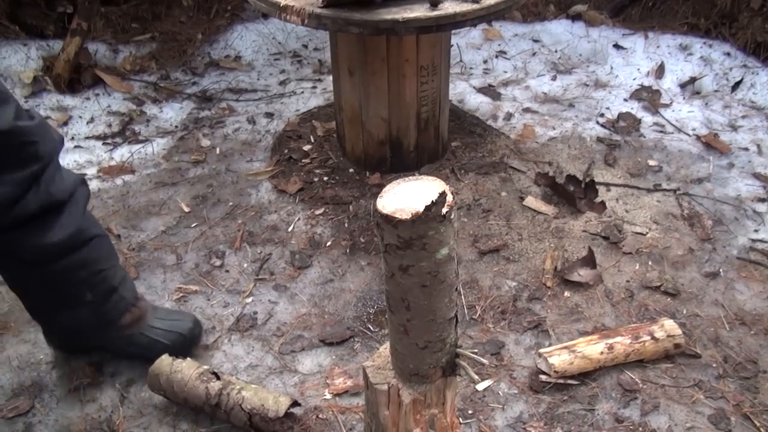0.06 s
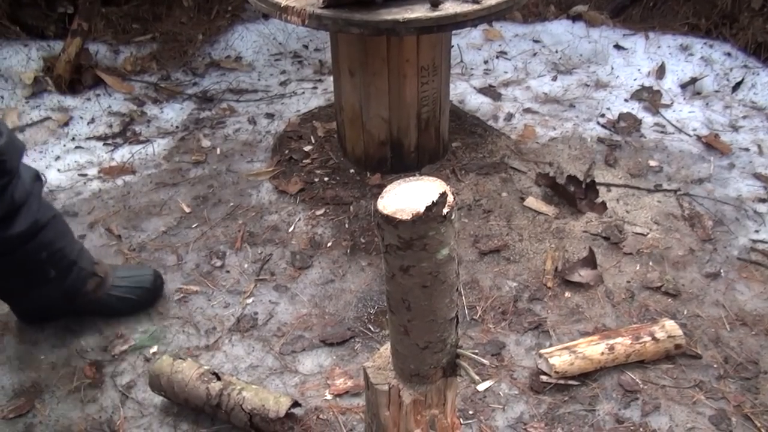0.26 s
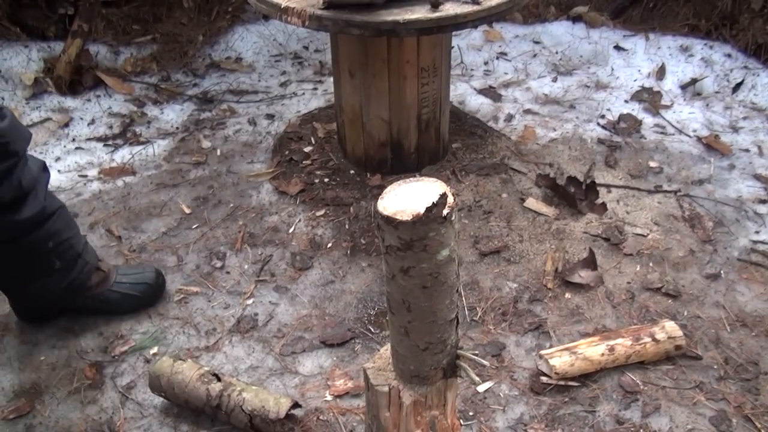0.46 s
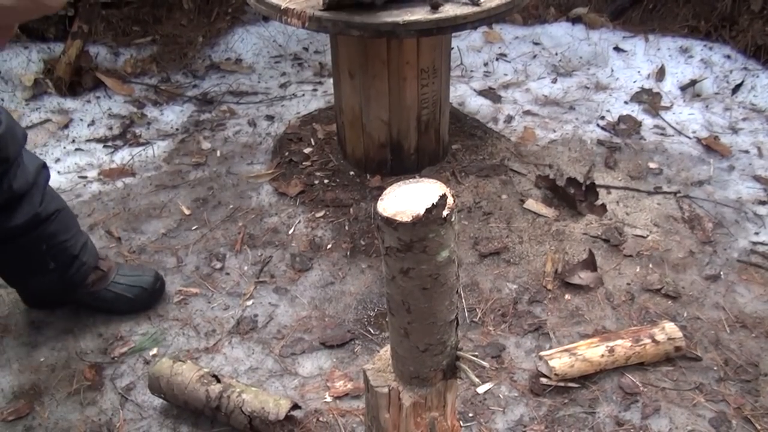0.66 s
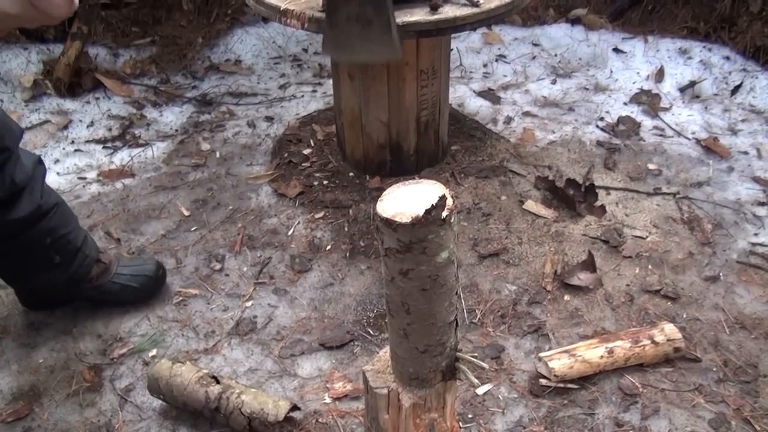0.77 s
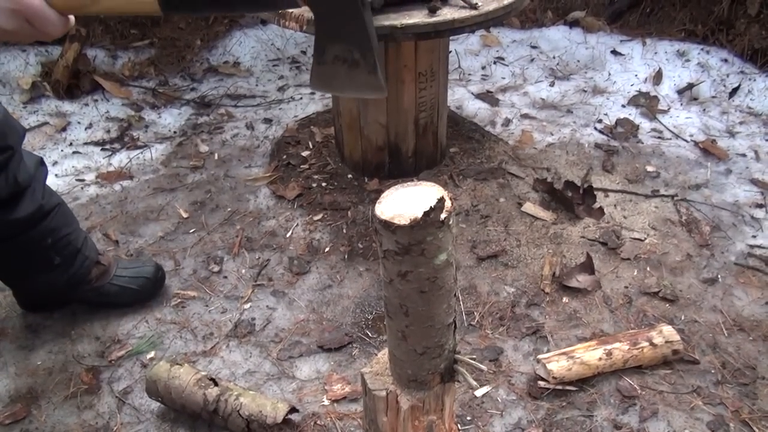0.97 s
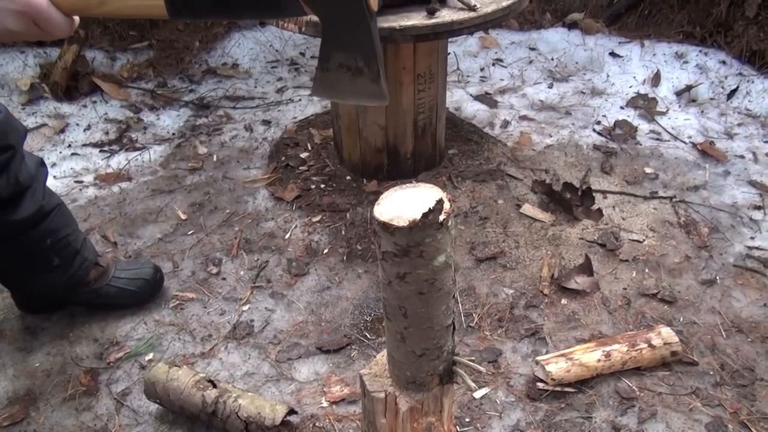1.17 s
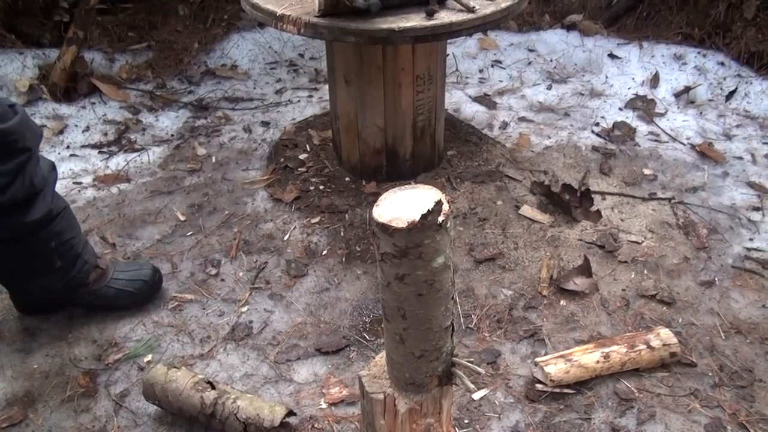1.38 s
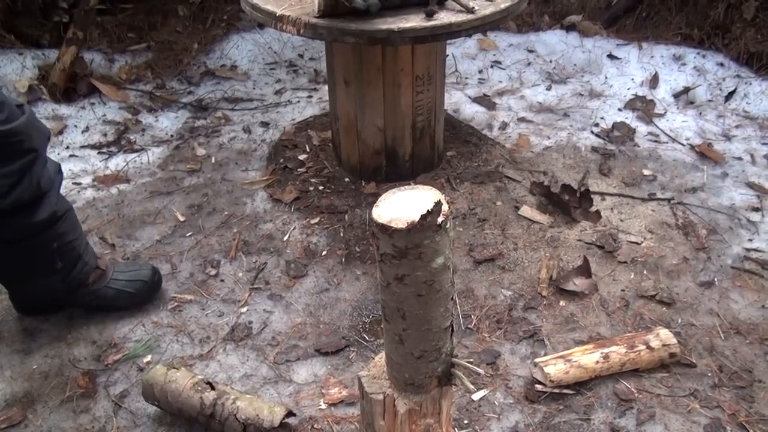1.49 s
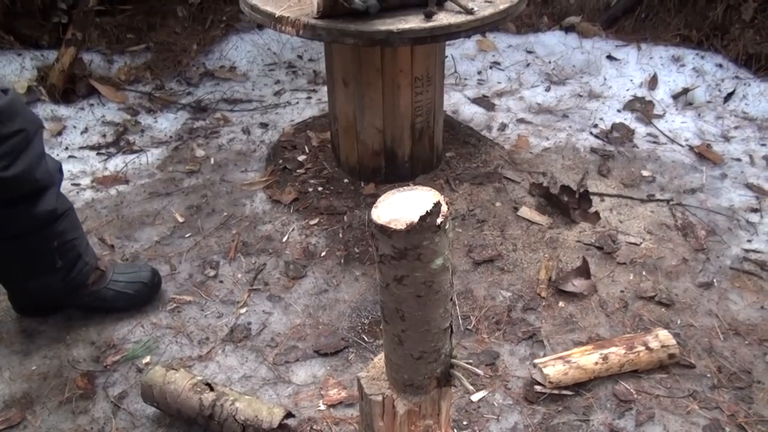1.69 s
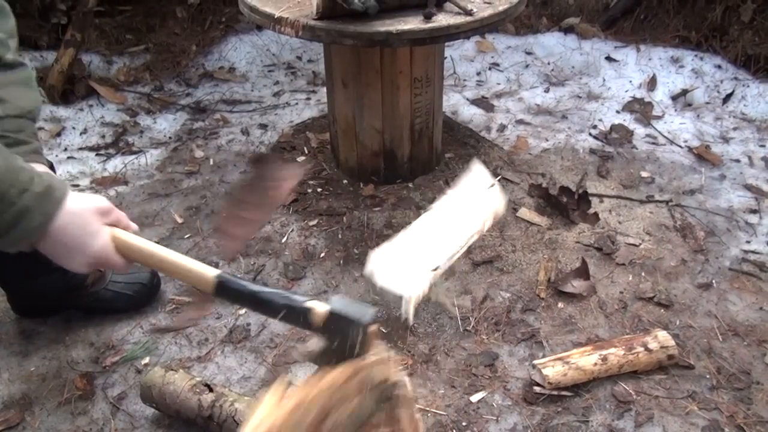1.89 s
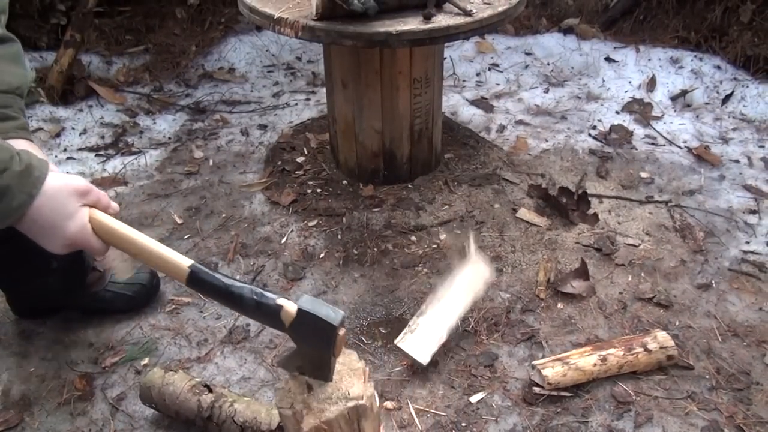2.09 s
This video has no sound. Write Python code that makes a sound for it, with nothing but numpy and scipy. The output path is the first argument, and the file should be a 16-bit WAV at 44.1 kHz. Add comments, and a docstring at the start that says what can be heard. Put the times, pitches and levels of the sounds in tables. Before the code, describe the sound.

Gritty boot scuffs and a dull thump come first, then near quiet with faint taps and cloth rustle, then a hard wooden crack and small clattering pieces. Outdoors, close, nearly central, faint air noise.

```python
"""An axe splits a small log on a chopping block in a quiet frozen yard: snapping fibres crackle and
set the log ringing, dull blows thud, and split pieces knock with struck modes.
Before that, boots scuff gritty ground as dense clumped clicks and a jacket rustles through the swing
as fine clicks. Ticks of grit and chips are clicks with short noise bursts; the ground shudders in
low noise. Filtered noise and a thin sine make the yard behind it, and low noise buffets the left."""
import sys
import numpy as np
from scipy import signal
from scipy.io import wavfile
from scipy.ndimage import uniform_filter1d

SR = 44100
rng = np.random.default_rng(int(sys.argv[2]) if len(sys.argv) > 2 else 0)


def file_out(sig):
    """Save sig as 16-bit WAV at sys.argv[1]."""
    # one column per channel
    cols = np.atleast_2d(sig).T
    # limit, then scale
    lim = np.clip(cols, -1, 1)
    pcm = np.round(lim * 32767).astype(np.int16)
    wavfile.write(sys.argv[1], SR, pcm)


def gain_from_decibels(decibels):
    """Convert decibel values to linear amplitude factors."""
    exponent = np.asarray(decibels, float) / 20
    return 10 ** exponent


N = 94770  # length in samples

CLICK_S = 2e-5  # decay time of the contact click in ticks and knocks


def rms_one(x):
    """Scale to unit rms."""
    return x / np.sqrt(np.mean(x ** 2) + 1e-20)


def band(x, low_hz, high_hz):
    """Band-pass of order 2."""
    edges_hz = [low_hz, min(high_hz, 0.45 * SR)]
    return signal.sosfilt(signal.butter(2, edges_hz, "band", fs=SR, output="sos"), x)


def ring(x, hz, t60):
    """Two-pole resonator: a unit click sets a dying sine of starting height 1 ringing."""
    radius = gain_from_decibels(-60 / (t60 * SR))
    angle = 2 * np.pi * hz / SR
    return signal.lfilter([0, np.sin(angle)], [1, -2 * radius * np.cos(angle), radius ** 2], x + 1e-18)


def add(out, s, x):
    """Mix x in at time s, in seconds."""
    i = int(s * SR)
    out[i:i + len(x)] += x[:N - i]


def grains(per_s, size_db):
    """Random clicks of uneven size and either sign."""
    happens = rng.random(N) < per_s / SR
    size = gain_from_decibels(size_db * np.minimum(rng.exponential(1, N), 5))
    return happens * size * rng.choice([-1, 1], N)


def drift(rate_hz):
    """Smoothly wandering random curve of unit rms."""
    r = np.exp(-2 * np.pi * rate_hz / SR)
    return rms_one(signal.lfilter([1], [1, -2 * r, r * r], rng.standard_normal(N)))


def coloured(sources, spectrum):
    """Shape two sources with a half-octave bank; returns middle, treble, bass and low-middle parts."""
    hz, db = np.transpose(spectrum)
    parts = np.zeros((4, N))
    edges = 22.1 * 2 ** np.arange(0, 9.6, 0.5)
    for k, (low, high) in enumerate(zip(edges, edges[1:])):
        centre = np.sqrt(low * high)
        gain = gain_from_decibels(np.interp(np.log(centre), np.log(hz), db))
        # counted from the end: bass is -2, low middle -1, then middle 0 and treble 1
        part = int(centre > 250) + int(centre > 900) + int(centre > 3800) - 2
        parts[part] += gain * band(sources[k % 2], low, high)  # neighbouring bands use different sources
    return parts


def stroke(rows, parts, fade_s):
    """Each part, at unit rms, follows its level curve; silent outside the stroke."""
    s, *levels = np.transpose(rows)
    t = np.arange(N) / SR
    fade_in = np.clip((t - s[0]) / 0.00026 + 1, 0, 1)
    fade_out = np.clip((s[-1] - t) / fade_s + 1, 0, 1)
    shaped = sum(rms_one(part) * gain_from_decibels(np.interp(t, s, db)) for part, db in zip(parts, levels))
    return fade_in * fade_out * shaped


def yard():
    """Distant wash of shaped noise, a faint hum of narrow-band noise and a thin sine whine."""
    # Colour of the wash. Each row: frequency in Hz, relative level in dB.
    wash_spectrum = [(15, -53), (25, -25), (87, -5.5), (166, -15), (659, -13), (911, -13), (1040, -19),
                     (1130, -15), (1520, -16), (14800, -31), (16000, -22)]
    wash_db, hum_db, whine_db = -65.5, -75.5, -88
    hum_hz, hum_half_width_hz, whine_hz = 1170, 22, 13700
    wash = rms_one(coloured(rng.standard_normal((2, N)), wash_spectrum).sum(axis=0))
    hum = rms_one(band(rng.standard_normal(N), hum_hz - hum_half_width_hz, hum_hz + hum_half_width_hz))
    whine = np.sin(2 * np.pi * whine_hz * np.arange(N) / SR)
    return gain_from_decibels(wash_db) * wash + gain_from_decibels(hum_db) * hum + gain_from_decibels(whine_db) * whine


def air_buffet(near):
    """Low noise of air on the left port, stirred by nearby movement."""
    level_db, follow_power = -63, 0.57
    stir = (uniform_filter1d(np.abs(near), size=2000) + 1e-6) ** follow_power
    air = rms_one(band(rng.standard_normal(N), 18, 59))
    return gain_from_decibels(level_db) * rms_one(stir) * air


def scuffs():
    """Dense grit dragged under the sole, crushed in clumps; the bass of grit stays weak."""
    # Boots dragging on grit. Each row: time in seconds, then the levels of middle, treble, bass
    # and low middle in dB, the bass before its ceiling.
    scuff_curve = [(0.0, -56, -62, -65, -51), (0.016, -53, -59.5, -66, -59.5),
                   (0.046, -53.5, -55.5, -60.5, -53.5), (0.054, -51.5, -54.5, -60.5, -70),
                   (0.08, -47, -55.5, -68, -43), (0.092, -59, -57, -72, -61), (0.194, -62, -67, -93, -67.5),
                   (0.222, -55, -60, -38, -65), (0.248, -50, -53, -50, -46),
                   (0.288, -50.5, -48.5, -48.5, -46), (0.314, -50.5, -55.5, -73, -53.5),
                   (0.342, -60, -65.5, -65, -66.5), (0.386, -55, -58.5, -73, -58),
                   (0.432, -48.5, -54, -56, -51), (0.452, -61, -64.5, -60, -65.5),
                   (0.478, -67, -67, -76, -65), (0.51, -45, -50, -34, -44), (0.56, -41, -43.5, -48, -44),
                   (0.586, -43.5, -52.5, -53.5, -51.5), (0.608, -69, -66, -77, -64),
                   (0.64, -56.5, -67, -73, -65), (0.67, -66, -65.5, -86, -75.5),
                   (0.706, -46, -49.5, -62, -49.5), (0.762, -62.5, -65.5, -72, -64),
                   (0.814, -60.5, -62.5, -84, -65), (0.844, -58.5, -64.5, -84, -63),
                   (0.854, -69, -67, -73, -67), (0.9, -66.5, -74, -83, -71)]
    # Colour of the grit. Each row: frequency in Hz, relative level in dB.
    grit_spectrum = [(29, -34), (50, -7), (198, -1), (950, -2), (1150, -4), (2320, -9), (4040, -13),
                     (7210, -15), (16000, -27.5)]
    grains_per_s, grain_size_db = 5000, 2
    clump_rate_hz, clump_db = 70.5, 3
    bass_max_db = -43.5
    rows = [(s, mid, treble, min(bass, bass_max_db), low) for s, mid, treble, bass, low in scuff_curve]
    crushed = [grains(grains_per_s, grain_size_db) * gain_from_decibels(clump_db * drift(clump_rate_hz)) for _ in range(2)]
    return stroke(rows, coloured(crushed, grit_spectrum), fade_s=0.081)


def thuds():
    """A soft push: a low sine with a quickly swelling onset that dies away."""
    # Dull blows of heel, blade and wood on ground or block. Each row: start in seconds,
    # relative level in dB, frequency in Hz, 60 dB decay time in seconds.
    blows = [(.043, -45, 170, 0.042), (0.227, -44.5, 129, 0.069), (.427, -41.5, 288, 0.035),
             (0.511, -18.5, 169, 0.028), (1.005, -59, 273, 0.039), (1.3294, -50, 680, 0.015),
             (1.331, -54, 327, 0.021), (1.8116, -17, 481, 0.016), (1.8473, -13.5, 390, 0.01),
             (1.858, -30.5, 117.4, 0.1), (2.1376, -12, 336, 0.009), (2.1405, -22, 116, 0.072),
             (2.142, -29.5, 480, 0.0066)]
    out = np.zeros(N)
    t = np.arange(int(0.3 * SR)) / SR
    for s, db, hz, t60 in blows:
        swell = 1 - np.exp(-3.0 * hz * t)
        decay = gain_from_decibels(db - 60 * t / t60)
        add(out, s, 2 * decay * swell * np.sin(2 * np.pi * hz * t))
    return out


def ticks():
    """A sharp click and a burst of dying noise in one band."""
    # Small ticks of grit, zips and chips. Each row: start in seconds, peak level in dB,
    # centre frequency in Hz, 60 dB decay time of the noise in seconds, bandwidth in octaves.
    tick_rows = [(.044, -29.5, 3360, 0.013, 2.2), (.130, -38, 1600, 0.018, 1.4),
                 (0.4257, -31, 2420, 0.011, 1.08), (.489, -49, 1200, 0.027, 2.2),
                 (.664, -52, 2050, 0.017, 1.2), (0.6851, -36.5, 6000, .015, 1),
                 (0.819, -38, 2600, 0.022, 1.1), (.841, -39.5, 2600, 0.013, 1.6),
                 (.953, -45, 2750, 0.013, 1.6), (1.003, -43.5, 1930, 0.047, 2.2),
                 (1.077, -47.5, 3930, 0.034, 2.2), (1.330, -37, 1500, 0.032, 2),
                 (1.622, -39.5, 980, .012, 1.2), (1.7, -39, 2690, 0.025, 0.66),
                 (1.932, -29, 5960, .012, 3.1), (1.947, -21, 7400, 0.013, 0.9),
                 (1.9595, -31, 5000, 0.0068, 3.9), (1.9601, -19, 9200, 0.0089, 2.5),
                 (1.975, -34, 8870, 0.022, 0.4), (1.998, -42, 2960, 0.024, 0.87),
                 (2.055, -28, 4300, .015, 0.94), (2.077, -26, 7800, 0.022, 2.2),
                 (2.085, -25.5, 6130, 0.019, 0.89), (2.128, -26.5, 5960, 0.028, 0.79),
                 (2.1355, -22, 8200, .02, 1.3)]
    out = np.zeros(N)
    t = np.arange(2048) / SR
    for s, db, hz, t60, width in tick_rows:
        burst = rng.standard_normal(len(t)) * gain_from_decibels(-60 * t / t60) + 6.3 * np.exp(-t / CLICK_S)
        half_width = 2 ** (width / 2)
        x = band(band(burst, hz / half_width, hz * half_width), 110, 12000)
        add(out, s, gain_from_decibels(db) * x / np.abs(x).max())
    return out


def knocks():
    """A blow and a short rattle ring the modes of a piece; higher modes die sooner."""
    # Knocks of twigs, handle and split pieces, and the main crack of the log as it splits (1.8219 s and 1.8325
    # s). Each row: start in seconds, peak level in dB, # reference mode in Hz, 60 dB decay time of that mode in
    # seconds.
    knock_rows = [(0.4265, -33, 1650, 0.016), (0.842, -41.5, 2290, .025), (1.003, -48.5, 2130, 0.032),
                  (1.329, -47, 2017, 0.073), (1.8219, -18, 1544, 0.045), (1.8325, -12.5, 1170, 0.057),
                  (1.8745, -26.5, 2014, 0.038), (1.879, -26, 2040, .02), (2, -37, 1970, 0.04),
                  (2.0548, -29.5, 2070, 0.046), (2.067, -33, 1576, 0.043), (2.076, -28.5, 2470, .025),
                  (2.086, -28, 2470, .02), (2.096, -40, 2360, 0.017), (2.127, -30.5, 1464, 0.032),
                  (2.134, -28, 1550, 0.014)]
    # Modes of a piece. Each row: ratio to the reference mode, relative level in dB.
    piece_modes = [(1, 0), (.93, -7), (.62, -12), (1.45, -11), (2.02, -13), (2.75, -13)]
    out = np.zeros(N)
    t = np.arange(4096) / SR
    for s, db, hz, t60 in knock_rows:
        rattle = 0.13 * rng.standard_normal(len(t)) * np.exp(-t / 0.0021)
        contact = np.exp(-t / CLICK_S) + rattle
        x = sum(gain_from_decibels(g) * ring(contact, hz * k, t60 / np.sqrt(k)) for k, g in piece_modes)
        add(out, s, gain_from_decibels(db) * x / np.abs(x).max())
    return out


def jacket():
    """Stiff cloth rustles in many fine crinkles, each a small click."""
    # Jacket during the swing. Each row: time in seconds, then the levels of middle, treble,
    # bass and low middle in dB.
    swing_curve = [(1.35, -65, -78, -86, -78), (1.368, -73, -73, -85, -66), (1.386, -68, -82, -75, -81),
                   (1.418, -65, -73, -82, -63), (1.456, -62.5, -69.5, -80, -61),
                   (1.562, -56, -62, -72, -53), (1.608, -56, -62, -75, -63), (1.672, -58.5, -64, -69, -60),
                   (1.688, -55.5, -64, -78, -59.5), (1.785, -55.5, -59.5, -61, -54.5)]
    # Colour of the cloth. Each row: frequency in Hz, relative level in dB.
    cloth_spectrum = [(29, -58), (50, -28), (70, -8), (218, -9), (298, -1), (863, -4.5), (1150, -5),
                      (2810, -9.5), (16000, -26.5)]
    crinkles = [grains(per_s=8000, size_db=3.7) for _ in range(2)]
    return stroke(swing_curve, coloured(crinkles, cloth_spectrum), fade_s=0.06)


def split():
    """Snapping fibres crackle as the blade runs down the log, and set the log ringing."""
    # Fibres tearing, then debris. Each row: time in seconds, then the levels of middle, treble,
    # bass and low middle in dB.
    tear_curve = [(1.8072, -25, -29, -30, -18.5), (1.813, -26, -29, -37, -26.5),
                  (1.819, -27.5, -28.5, -44, -30), (1.825, -17.5, -28.5, -34.5, -37),
                  (1.836, -24.5, -29, -44, -33.5), (1.845, -25.5, -35, -28, -32),
                  (1.856, -36.5, -40.5, -39.5, -36.5), (1.885, -45, -47, -42.5, -58),
                  (1.90, -49.5, -58.5, -54, -49), (1.96, -50, -55, -62, -59.5),
                  (2.0, -60.5, -63.5, -77, -62), (2.052, -63, -74, -84, -65), (2.058, -54.5, -58, -84, -64),
                  (2.09, -45.5, -51, -85, -63), (2.118, -67, -76, -72, -64), (2.126, -45, -58, -61, -71),
                  (2.138, -38, -43, -45, -34.5), (2.149, -32, -47, -43, -35)]
    # Colour of the fibres. Each row: frequency in Hz, relative level in dB.
    fibre_spectrum = [(29, -47), (50, -10), (337, -6.5), (729, -5.5), (1180, -3), (1330, -8), (1540, -2),
                      (8340, -12.5), (16000, -25)]
    # Brief modes of the log. Each row: frequency in Hz, relative level in dB,
    # 60 dB decay time in seconds.
    log_modes = [(346, -20, 0.033), (588, 0, 0.071), (1170, -5.5, 0.066), (1514, 4, 0.02),
                 (1810, -5, 0.011), (1920, 2, 0.023), (2600, -3, 0.025), (3020, 1, 0.0076),
                 (3580, 0, 0.005)]
    snaps_per_s, snap_size_db = 4000, 3.0
    log_db = -8  # all log modes against the crackle
    snaps = grains(snaps_per_s, snap_size_db)
    other_snaps = grains(snaps_per_s, snap_size_db)
    middle, treble, bass, low = coloured([snaps, other_snaps], fibre_spectrum)
    rings = []
    for hz, db, t60 in log_modes:
        struck = ring(snaps * rng.standard_normal(N), hz, t60)
        rings.append(gain_from_decibels(log_db + db) * rms_one(struck))
    # the two lowest modes join the low middle, the others the middle
    low = rms_one(low) + sum(rings[:2])
    middle = rms_one(middle) + sum(rings[2:])
    return stroke(tear_curve, (middle, treble, bass, low), fade_s=0.01)


def ground():
    """The ground shudders under the block: low noise that dies away after the blade lands."""
    start_s, level_db, centre_hz, t60_s = 1.89, -45, 60, 0.5
    t = np.arange(N) / SR - start_s
    noise = rms_one(band(rng.standard_normal(N), centre_hz / 1.4, centre_hz * 1.8))
    onset = np.clip(t / 0.0087, 0, 1)
    return noise * onset * gain_from_decibels(level_db - 60 * np.abs(t) / t60_s)


def with_echoes(near):
    """Ground and trees return delayed, duller copies of the near sounds."""
    # Reflections. Each row: delay in seconds, level in dB.
    reflections = [(.006, -26.5), (0.015, -24.5), (.031, -21), (.058, -45)]
    out = near.copy()
    dull = band(near, 225, 9000)
    for delay_s, db in reflections:
        add(out, delay_s, gain_from_decibels(db) * dull)
    return out


def scattered(near):
    """Copies smeared by a short burst of dying noise of unit energy."""
    t = np.arange(700) / SR
    smear = rng.standard_normal(len(t)) * np.exp(-t / 0.0044)
    return np.convolve(near, smear / np.linalg.norm(smear))[:N]


def scene():
    """Nearly central sources; scattered copies and yard noise give the narrow width."""
    side_db, yard_side_db = -18.5, -16
    pan_db, yard_pan_db = -0.36, -1.2  # left against right
    near = scuffs() + thuds() + ticks() + knocks() + jacket() + split() + ground()
    mid = with_echoes(near)
    side = gain_from_decibels(side_db) * scattered(near) + gain_from_decibels(yard_side_db) * yard()
    left = (mid + side) * gain_from_decibels(pan_db / 2) + air_buffet(near)
    right = (mid - side) / gain_from_decibels(pan_db / 2)
    far = yard() * gain_from_decibels(yard_pan_db * np.array([[0.5], [-0.5]]))
    return np.array([left, right]) + far


def top_cut(x):
    """Nothing passes above the cut-off."""
    return signal.sosfilt(signal.butter(12, 16820, fs=SR, output="sos"), x)


def record(dry):
    """Small microphones lose the deepest bass and the very top."""
    mix = band(dry, low_hz=73, high_hz=17000)
    return top_cut(mix)


dry = scene()
out = record(dry)
file_out(out)
```